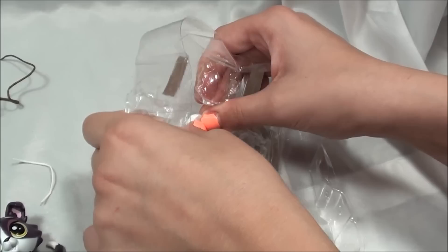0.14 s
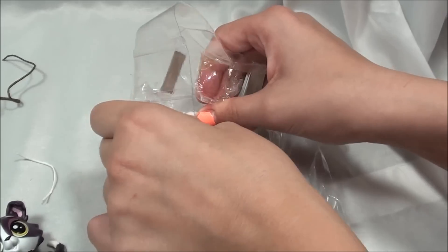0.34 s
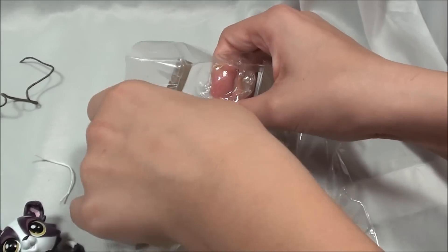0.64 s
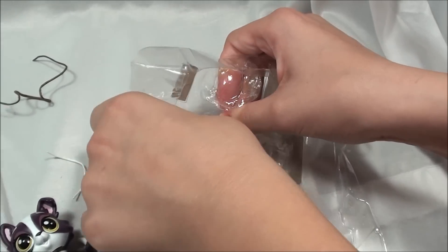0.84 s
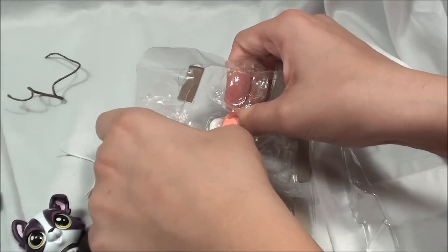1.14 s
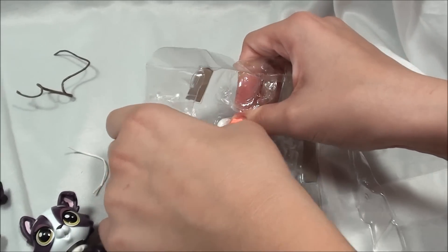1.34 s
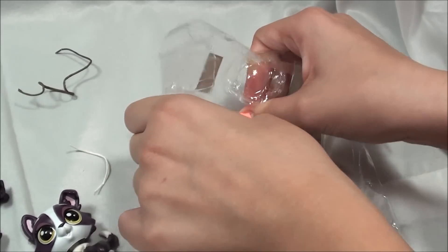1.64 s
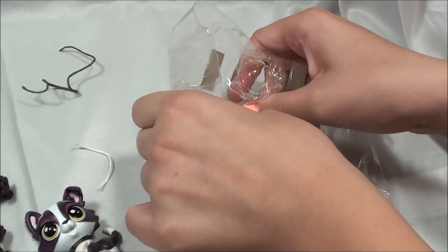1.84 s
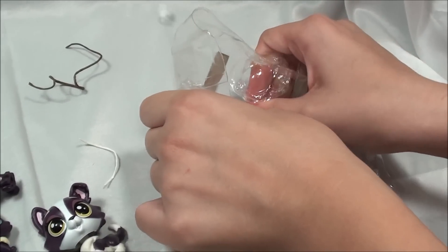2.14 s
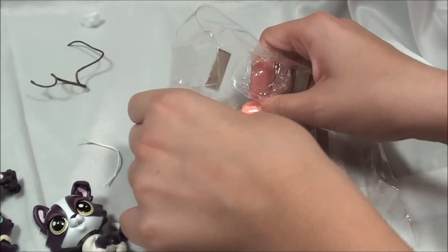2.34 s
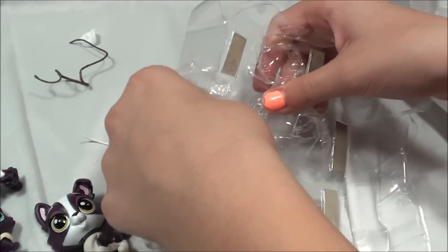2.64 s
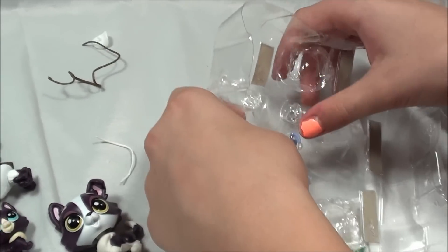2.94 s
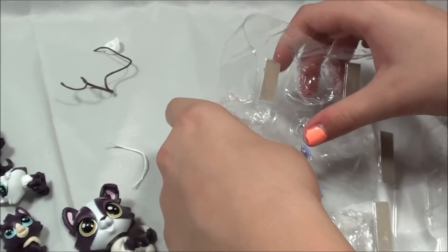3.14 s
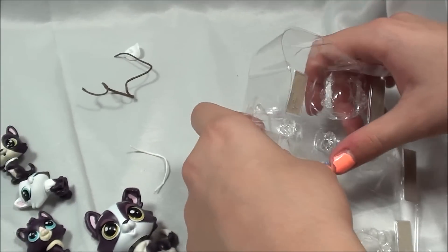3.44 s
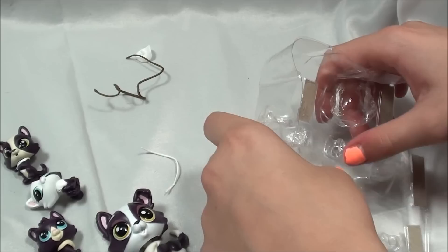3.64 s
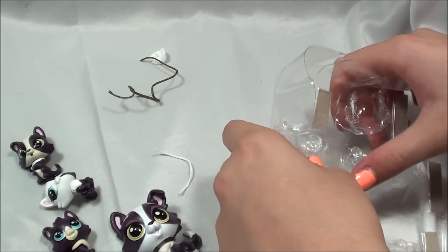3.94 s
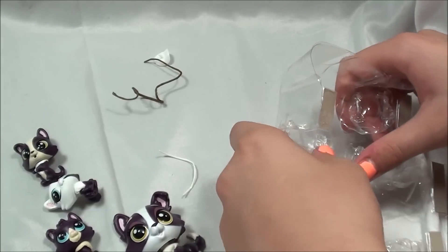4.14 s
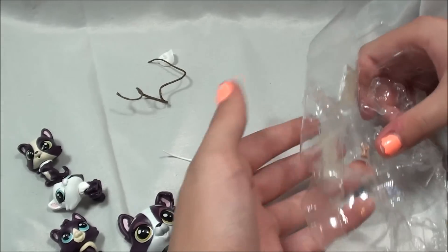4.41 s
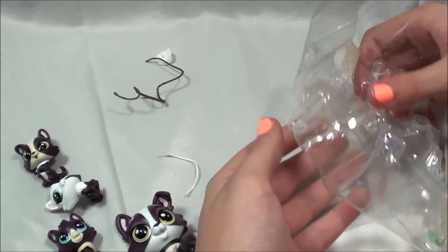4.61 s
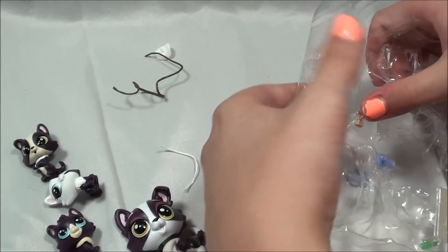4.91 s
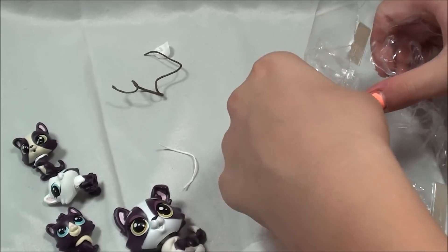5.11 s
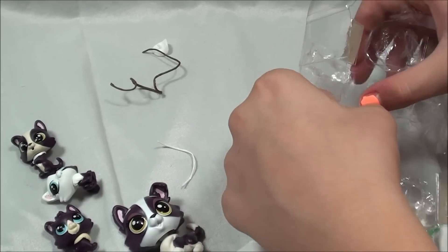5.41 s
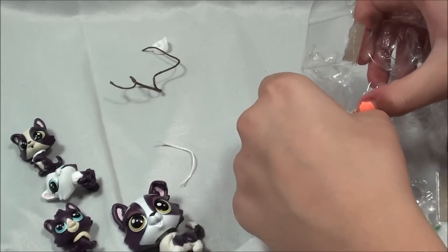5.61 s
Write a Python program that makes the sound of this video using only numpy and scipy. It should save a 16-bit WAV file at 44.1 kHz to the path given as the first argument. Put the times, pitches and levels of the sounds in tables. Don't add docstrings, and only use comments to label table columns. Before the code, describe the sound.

Close to the microphone, hands grip, twist and pry a stiff thin plastic tray. Sharp bright snaps and hollow pops come thickly for nearly three seconds, with short creaks and rustle. Then it calms to scattered small clicks, bursts into one strong crunch with a soft bump around four and a half seconds, and ends in light crackles. Small, fairly dry quiet room; faint hiss and low mains hum.

```python
import sys
import numpy as np
from scipy import signal
from scipy.fft import rfft, irfft, next_fast_len
from scipy.io import wavfile
from scipy.ndimage import map_coordinates

SR = 44100
rng = np.random.default_rng(int(sys.argv[2]) if len(sys.argv) > 2 else 0)


def voltage_ratio(level):
    return 10 ** (np.asarray(level, float) / 20)


def store_wav(level_fs):
    pcm = np.round(np.clip(np.atleast_2d(level_fs), -1, 1) * 32767)
    wavfile.write(sys.argv[1], SR, pcm.T.astype(np.int16))


N = 254456
SOFT_TOP_HZ = 15950

# (t/s, peak level/dB, ringing f/Hz)
CREASE_SNAPS = [(0.0094, -3, 6600), (0.0256, -9, 10400), (0.0299, -4.5, 5500), (0.047, -8.5, 5200),
                (0.066, -11, 7600), (0.1052, -12, 9500), (0.1498, -13, 3900), (0.1718, -4, 7580),
                (0.177, -0.5, 7800), (0.1987, -14, 5500), (0.2113, -10.5, 3670), (0.2455, -6, 8850),
                (0.2572, -4.5, 4080), (0.2844, -6, 9350), (0.294, -17, 8800), (0.3068, -1, 8300),
                (0.3189, -1, 5530), (0.3728, -8.5, 5600), (0.3949, -12, 4400), (0.4252, -15, 6000),
                (0.445, -4, 2770), (0.4796, -14, 6800), (0.502, -15.5, 3780), (0.5216, -6.5, 7560),
                (0.5697, -5.5, 9500), (0.5808, -14, 4500),
                (0.6494, -15, 6000), (0.672, 0.5, 6300), (0.691, -10, 8740), (0.696, -11, 4020),
                 (0.7004, -6, 10600), (0.706, -9, 8700), (0.7143, -1, 5300), (0.739, -12, 6400),
                 (0.845, -9.5, 6670), (0.872, 0, 7400), (0.91, -14, 3060), (0.9462, -12, 8200),
                 (0.953, -10.5, 7300), (1.0027, -17, 4100), (1.0228, -20, 4470), (1.0617, -8, 3230),
                 (1.0848, -4, 8060), (1.1714, -10, 7400), (1.211, -15.5, 3600), (1.2968, -17, 7100),
                 (1.2999, -6, 4900), (1.307, -7, 3720), (1.3431, -9.5, 5040), (1.3763, -12, 7960),
                 (1.399, -10, 4400), (1.422, -12, 2940), (1.457, -9, 6460), (1.489, -9, 3900),
                (1.519, 0.5, 3630), (1.5368, -1, 3600), (1.5639, 1.5, 3830), (1.616, -16, 9000),
               (1.6514, -3.5, 9000), (1.7184, -14.5, 6070), (1.7466, -7.5, 7960), (1.7685, -5.5, 3980),
               (1.7819, -8.5, 4160), (1.7908, -9.5, 3600), (1.81, -11.5, 4310), (1.8264, -8, 4010),
               (1.847, -7, 5670), (1.8865, -3.5, 4250), (1.899, -6, 3360), (1.91, -7.5, 8260),
               (1.9209, -5, 5430), (1.975, -8.5, 4900), (1.984, -11, 5290), (2.0077, -5, 6900),
               (2.019, -8.5, 7040), (2.0667, 0.5, 6400),
                (2.116, -5.5, 5700), (2.1304, 2, 8400), (2.1465, -2.5, 9600), (2.1733, -7.5, 6660),
                (2.195, -18, 9860), (2.4968, -6, 4030), (2.1835, -9.5, 6770), (2.2247, -1.5, 9600),
                (2.2724, -8, 3680), (2.378, -12.5, 6900), (2.384, -7, 2980), (2.394, -8, 9300),
                (2.446, -5.5, 7060), (2.4565, 0.5, 7040), (2.4777, -4, 7460), (2.482, -1, 10200),
                (2.506, -12.5, 7240), (2.5411, 1, 3820), (2.5757, -5, 7700), (2.6592, -0.5, 8000),
                (2.801, -11.5, 8160), (2.8317, -12, 6900), (2.837, -3, 7340), (2.9634, -14.5, 3600),
                (3.093, -17.5, 7200), (3.1412, -3, 6500), (3.207, -17, 3700), (3.3884, -17.5, 3480),
                (3.5932, -11, 3630), (3.853, -17.5, 2970), (3.96, -14, 5140), (4.006, -19, 7300),
                (4.0721, -22.5, 3480), (4.189, -18, 7000), (4.3262, -20.5, 6600), (4.3674, -6.5, 7900),
                (4.3742, -13, 3700), (4.387, -4.5, 7300), (4.43, -11, 6540), (4.4564, -3, 6300),
                (4.5282, -8, 6350), (4.701, -25.5, 3400), (4.8592, -33, 3850), (5.1193, -20.5, 9300),
                (5.1732, -23.5, 3630), (5.4994, -15.5, 9700), (5.5, -22, 13400), (5.53, -21, 10000),
                (5.561, -16, 9300), (5.568, -12, 9100), (5.6519, -19, 9700), (5.685, -19, 9300),
                (5.707, -11, 3270), (5.7098, -17, 7500), (5.718, -14.5, 6300),
                (1.3006, -15, 10000),
    (3.1412, -4, 10800),
    (3.1416, -5.5, 4100),
    (0.63, -4, 16000),
]
CREASES = CREASE_SNAPS

# (t/s, peak level/dB, ringing f/Hz)
DIMPLE_FLIPS = [(0.0096, -7, 1720), (0.101, -15.5, 1900), (0.148, -25, 1980), (0.2084, -6, 1540),
                (0.21, -8, 1006), (0.258, -17.5, 1430), (0.321, -12.5, 1680), (0.4452, -4, 840),
                (0.601, -12.5, 884), (0.6168, 0, 1303), (0.636, -10.5, 880), (0.671, -13.5, 1590),
                (0.839, -24, 2130), (0.874, -16, 1980), (1.004, -22, 1550), (1.085, -20, 1230),
                (1.1773, -6.5, 1580), (1.298, -6.5, 1540), (1.342, -16.5, 2550), (1.457, -18, 1780),
                (1.489, -18, 2000), (1.766, -20, 1500), (1.784, -14, 703), (1.828, -10, 1610),
                (1.831, -16.5, 696), (1.858, -25, 720), (1.887, -14.5, 1540), (1.895, -15.5, 695),
                (1.974, -20.5, 1600), (2.01, -16.5, 2620), (2.096, -24, 780), (2.1257, -10, 1470),
                (2.147, -11, 3510), (2.183, -19, 676), (2.223, -5.5, 1510), (2.373, -16.5, 1430),
                (2.39, -25, 2380), (2.482, -14, 1200), (2.497, -5.5, 727), (2.5411, -9.5, 1560),
                (2.5442, -6.5, 2830), (2.58, -8.5, 1500), (2.659, -3, 2580), (2.838, -9.5, 1330),
                (3.151, -11, 705), (3.389, -23.5, 1360), (3.961, -23.5, 2280), (4.071, -19, 910),
                (4.367, -7.5, 1970), (4.388, -5.5, 2520), (4.4126, -6, 2550), (4.4398, -3, 1870),
                (4.4422, -15, 990), (4.462, -3, 1350), (4.475, -7, 1500), (2.772, -42, 2000),
                (3.317, -35, 1520), (4.152, -35, 1070), (5.048, -42, 520), (5.71, -18.5, 2740)]
DIMPLES = DIMPLE_FLIPS

# (f/Hz, level per Hz/dB)
FINE_COLOUR = [(1470, -12), (2600, -8), (3600, -5), (5000, -8), (7300, -5.5), (9420, -14), (15100, -17),
               (16500, 1)]


def unit(x):
    return x / np.sqrt(np.mean(x ** 2) + 1e-20)


def along(points, hz):
    f, v = np.transpose(points)
    return np.interp(np.log(hz + 1), np.log(f + 1), v)


def curves(rows):
    s, *columns = np.transpose(rows)
    return [np.interp(np.arange(N) / SR, s, column) for column in columns]


def wobble(rate):
    knots = rng.standard_normal(int(N * rate / SR) + 4)
    return map_coordinates(knots, [np.arange(N) * rate / SR])


def decay(x, t60):
    return signal.lfilter([1], [1, -voltage_ratio(-60 / (t60 * SR))], x)


def filtered(x, response):
    m = next_fast_len(x.shape[-1] + 4096)
    return irfft(rfft(x, m) * response(np.fft.rfftfreq(m, 1 / SR)), m)[..., :x.shape[-1]]


def resonance(f, hz, width):
    return 1j * f * width / (hz * hz - f * f + 1j * f * width)


def high_pass(f, hz):
    return (1j * f / (hz + 1j * f)) ** 2


def place(s, db, rows):
    rows = rows / np.abs(rows).max(axis=1, keepdims=True) * voltage_ratio(db)[:, None]
    at = np.round(s * SR).astype(int)[:, None] + np.arange(rows.shape[1])
    return np.bincount(at.ravel(), rows.ravel(), N + SR)[:N]


def burst(count, t60, rise, tail_db, tail_t60, kick, spike_db=3, spike=0.37, size=4096):
    t = np.arange(size) / SR
    t60 = t60[:, None]
    rise = rise * voltage_ratio(3.5 * rng.standard_normal((count, 1)))
    first = voltage_ratio(spike_db - 60 * t / (spike * t60))
    tail = voltage_ratio(tail_db - 60 * t / tail_t60)
    shape = first + voltage_ratio(-60 * t / t60) + tail
    blow = kick * t / rise * np.exp(1 - t / rise)
    return blow + (1 - np.exp(-t / rise)) ** 2 * shape * rng.standard_normal((count, size))


def snaps():
    # (t/s, peak level/dB, ringing f/Hz)
    further_snaps = [(0.02, -11.5, 3170), (0.0402, -5, 11400), (0.0914, -25, 3620), (0.0948, -16, 6430),
                      (0.1317, -23, 3950), (0.1955, -16, 8040), (0.23, -16, 9570), (0.3927, -14, 6020),
                      (0.4035, -16, 4300), (0.4126, -19, 7210), (0.467, -18, 3120), (0.545, -28, 4120),
                      (0.5776, -16, 8090), (0.596, -16.5, 3840), (0.6, -21, 3750), (0.606, -25, 3730),
                      (0.609, -23, 4320), (0.6601, -11, 3090), (0.6671, -11, 4540), (0.794, -24, 7490),
                      (0.8011, -22, 12860), (0.8082, -25, 4740), (0.817, -26, 8290), (0.9275, -24, 6490),
                      (0.936, -22, 9500), (0.9426, -10, 3600), (0.966, -21.5, 7810), (1.011, -18, 8160),
                      (1.0496, -22, 8710), (1.1918, -17, 5210), (1.2291, -27, 13110), (1.2353, -23.5, 3050),
                      (1.289, -28, 5060), (1.3205, -25, 8000), (1.3953, -14, 3090), (1.412, -21, 4490),
                      (1.4152, -26, 6100), (1.4958, -15, 3090),
                      (1.5073, -18, 8600), (1.581, -17, 4630), (1.588, -17, 7600), (1.5936, -23, 11000),
                     (1.626, -26, 3090), (1.633, -14, 8410), (1.6367, -16, 7160), (1.76, -10, 8400),
                     (1.8008, -15, 3970), (1.8343, -18, 5600), (1.8755, -27, 6410), (1.9396, -20, 5160),
                     (1.9465, -22, 8060), (1.9542, -27, 5910), (2.0335, -19, 4180), (2.092, -15, 4290),
                     (2.099, -23, 4190), (2.108, -17, 4150), (2.2472, -19, 7100), (2.2933, -18, 4290),
                     (2.3077, -22, 3610), (2.3342, -18.5, 4520), (2.3609, -26, 6240), (2.365, -23, 7500),
                     (2.373, -20, 3730), (2.534, -19, 6380), (2.5583, -18, 12300), (2.6244, -22, 6740),
                     (2.636, -18, 3200), (2.65, -16, 14060), (2.666, -17, 6980), (2.6849, -25, 7780),
                     (2.691, -12.5, 6960), (2.7463, -31.5, 6650),
                      (2.922, -27, 9970), (3.4083, -34, 7190), (3.5809, -26, 9220), (3.7222, -28.5, 6900),
                     (3.8637, -29, 6150), (3.8846, -31, 6510), (3.9976, -22.5, 7360), (4.019, -28, 7700),
                     (4.3454, -24, 8420), (4.417, -12, 3600), (4.72, -28, 5070), (4.9879, -28, 8600),
                     (5.051, -23.5, 10300), (5.1655, -22, 2600), (5.2869, -30.5, 6050), (5.376, -29, 9690),
                     (5.388, -25, 9690), (5.4822, -31, 9700), (5.5195, -17.5, 9200), (5.5929, -31, 9560),
                     (5.6062, -32, 7800), (5.6147, -21, 8700), (5.631, -22, 8760), (5.6567, -25, 9410),
                     (5.6604, -25, 9680), (5.664, -24, 8210), (5.572, -15, 10500), (5.674, -19, 9400),
                     (5.6778, -25, 9170), (5.695, -23, 7080), (5.7413, -19, 3200), (5.759, -22, 11780)]

    s, db, hz = np.transpose(CREASES + further_snaps)
    t60 = 0.028 * (6000 / hz) ** 0.5
    hz = hz[:, None]
    push = burst(len(s), t60, 0.00006, tail_db=-24, tail_t60=0.06, kick=3.03, spike_db=13, spike=0.27, size=2048)
    ring = filtered(push, lambda f: resonance(f, hz, 0.23 * hz))
    tear = burst(len(s), 0.5 * t60, 0.00015, tail_db=-23, tail_t60=0.03, kick=0, spike_db=8, size=2048)
    crack = filtered(tear, lambda f: high_pass(f, 0.42 * hz))
    return place(s, db + 2.0, ring + 0.66 * crack)


def pops():
    # (t/s, peak level/dB, ringing f/Hz)
    further_dimples = [(0.2835, -23, 1710), (0.522, -25, 1670), (0.6957, -21.5, 1460), (0.8084, -26, 2210),
                       (0.9874, -26, 1650), (1.0491, -33, 2330), (1.0632, -21.5, 1460), (1.0767, -23, 1500),
                       (1.1679, -9, 1690), (1.3777, -22, 1490), (1.411, -19, 1170), (1.5208, -7.5, 2480),
                       (1.6528, -29, 1340), (1.7504, -19, 1560), (1.9458, -25, 1630), (2.333, -21, 2060),
                       (2.3927, -14, 2520), (2.6906, -17.5, 2190), (2.8175, -25, 2000), (2.8746, -30, 2250),
                       (2.9237, -29, 1540), (2.9636, -22, 2510), (3.1758, -22, 1070), (3.206, -18, 1680),
                       (3.3559, -29, 2030), (3.5936, -21.5, 2280), (3.689, -36, 870), (3.7063, -32.5, 1250),
                       (4.0147, -21, 1950), (4.1903, -22.5, 1980), (4.2372, -29, 2120), (4.3739, -9, 1960),
                       (4.5283, -19, 2560), (5.147, -34, 2340), (5.2212, -24.5, 2000), (5.569, -23, 1720),
                       (5.6638, -29.5, 1600), (5.742, -28, 1270)]

    s, db, hz = np.transpose(DIMPLES + further_dimples)
    t60 = np.clip(0.054 * (1500 / hz) ** 0.11, 0.01, 0.1)
    hz = hz[:, None]

    def panel(f):
        main = resonance(f, hz, 0.07 * hz + 25)
        overtone = resonance(f, 1.78 * hz, 0.5 * hz)
        whole_tray = resonance(f, 1030, 500)
        return (main - 0.18 * overtone + 0.18 * whole_tray) * high_pass(f, 0.4 * hz) ** 2

    push = burst(len(s), 0.4 * t60, 0.00013, tail_db=-20, tail_t60=130 / hz, kick=5)
    return place(s, db + 0.15, filtered(push, panel))


def rings():
    # (t/s, peak level/dB, f/Hz, t60/s)
    humming = [
        (0.449, -15.5, 895, 0.27),
        (1.18, -22, 1620, 0.08),
        (2.225, -9, 2010, 0.025),
        (2.498, -12.5, 680, 0.067),
        (4.479, -24, 854, 0.15),
        (4.492, -29.5, 1240, 0.32),
        (4.499, -30.5, 484, 0.3),
        (5.174, -23.5, 375, 0.1),
        (5.499, -34, 347, 0.057),
    ]

    s, db, hz, t60 = np.transpose(humming)
    hz = hz[:, None]
    push = burst(len(s), t60, 0.00068, tail_db=-40, tail_t60=t60[:, None], kick=4.8, size=8192)

    def pair(f):
        return resonance(f, hz, 0.13 * hz) ** 2 - 0.35 * resonance(f, 1.25 * hz, 0.2 * hz) ** 2

    return place(s, db, filtered(push, pair))


def creaks():
    # (t/s, level/dB, slips per s, scrape level/dB)
    folds = [
        [(.112, -30.5, 152, -17), (.165, -29, 146, -2), (.205, -38, 104, -14)],
        [(1.607, -33.5, 105, -4), (1.68, -41, 88, -16), (1.71, -33, 150, -12.5), (1.748, -36, 200, -10)],
        [(2.186, -31.5, 266, 3), (2.22, -28, 310, -13), (2.27, -33, 300, -4.5), (2.318, -24.5, 158, -12)],
        [(2.40, -33, 324, 2), (2.43, -35.5, 130, 3.5), (2.455, -38, 210, 3)],
    ]
    # (f/Hz, width/Hz, level/dB)
    fold_panels = [(1680, 250, -3), (3600, 1900, 4), (7240, 440, 4.5), (9600, 6400, -7.5)]

    slips, scrape = np.zeros((2, N))
    for rows in folds:
        db, rate, bright_db = curves(rows)
        on = slice(round(rows[0][0] * SR), round(rows[-1][0] * SR))
        turns = np.cumsum(rate[on]) / SR
        at = on.start + np.flatnonzero(np.diff(np.floor(turns)))
        scatter = rng.standard_normal((len(at), 2))
        late = np.round(0.08 * scatter[:, 0] * SR / rate[at]).astype(int)
        slips[at + late] = voltage_ratio(db[at] + 41.0 + 2.6 * scatter[:, 1]) * np.sqrt(200 / rate[at])
        scrape[at + late] = slips[at + late] * voltage_ratio(bright_db[at] - 27.5)
    scrape = decay(scrape, 0.02) * rng.standard_normal(N)

    def panel(f, row):
        hz, width, db = row
        return voltage_ratio(db) * resonance(f, hz, width)

    def small_panels(f):
        return sum((-1) ** k * panel(f, row) for k, row in enumerate(fold_panels[1:]))

    large = filtered(slips, lambda f: panel(f, fold_panels[0]) * resonance(f, 1680, 1300))
    return large + filtered(scrape, small_panels)


def crinkle(spectrum, rate, spread_db, t60):
    chance = rng.random((2, N))
    size_db = np.minimum(-abs(spread_db) * np.log(chance[1] + 1e-9), 11)
    sizes = (chance[0] < rate / SR) * voltage_ratio(size_db)
    puffs = decay(sizes, t60) * rng.standard_normal(N)
    return unit(filtered(puffs, lambda f: voltage_ratio(along(spectrum, f))))


def shaken(events, db):
    s, peak_db, _ = np.transpose(events)
    jolt = voltage_ratio(0.76 * peak_db + db)
    jolts = np.bincount(np.round(s * SR).astype(int), jolt, N)[:N]
    return decay(jolts, 0.085)


def rustle():
    # (t/s, effort level/dB, fine over body level/dB)
    handling = [(0, -31.5, 22), (.08, -39, -15), (.16, -34.5, 10), (.35, -27, 13), (.45, -37, -9),
                (.72, -42, 20), (1.13, -43.5, 3), (2.15, -37.5, -11), (2.62, -32, 12.5), (2.72, -43.5, 9.5),
                (3.3, -41.5, 10.5), (3.5, -46.5, 5.5), (4.0, -43.5, 5.5), (4.33, -41.5, 2),
                (4.58, -51, -19), (5.08, -56.5, 12), (5.33, -40, 6), (5.77, -53.5, 14)]
    # (f/Hz, level per Hz/dB)
    body_colour = [(88, -50), (150, 4.5), (489, -10), (871, 3), (1160, -2), (1490, 3.5), (4000, -12),
                   (5200, -15), (8800, -120)]

    effort_db, fine_db = curves(handling)
    body = crinkle(body_colour, rate=500, spread_db=4.0, t60=0.02)
    body = body + 0.096 * crinkle(body_colour, rate=3600, spread_db=21.0, t60=0.021)
    fine = crinkle(FINE_COLOUR, rate=450, spread_db=4.5, t60=0.008)
    fine = fine + 0.5 * crinkle(FINE_COLOUR, rate=5000, spread_db=1.5, t60=0.005)
    body_gain = voltage_ratio(effort_db - 6.0) + shaken(DIMPLES, -18.5)
    fine_gain = voltage_ratio(effort_db + fine_db - 9.5 + 2.2 * wobble(7.7)) + shaken(CREASES, -24.5)
    return filtered(body_gain * body + fine_gain * fine, lambda f: f < SOFT_TOP_HZ)


def slides():
    # (rise/s, t60/s, dull level/dB, bright level/dB)
    swells = [(0.015, 0.22, -25, -13.5), (0.0012, 0.017, -10, 2), (0.0047, 0.034, -12, 2.5),
              (0.00091, 0.16, -17.5, -12), (0.02, 0.087, -1.5, 3), (0.013, 0.14, -25, -24),
              (0.0034, 0.044, -18.5, -16), (0.053, 0.6, -56, -28), (0.028, 0.22, -42, -27),
              (0.12, 0.5, -31, -17.5)]
    starts = [.319, 2.539, 2.829, 4.386, 4.445, 5.157, 5.705, 3.03, 3.3, 4.27]

    rise, t60, dull_db, bright_db = np.transpose(swells)[:, :, None]
    t = np.maximum(np.arange(N) / SR - np.reshape(starts, (-1, 1)), 0)
    swell = (1 - np.exp(-t / rise)) * voltage_ratio(-60 * t / t60)
    dull_colour = [(300, -57.0), (700, -2.5), (1500, 7.5), (2500, 7.5), (5000, -21)]  # (f/Hz, level per Hz/dB)
    dull = crinkle(dull_colour, rate=2000, spread_db=14.5, t60=0.01)
    bright = crinkle(FINE_COLOUR, rate=2500, spread_db=3.5, t60=0.01)
    dull_gain = np.sum(voltage_ratio(dull_db) * swell, axis=0)
    bright_gain = np.sum(voltage_ratio(bright_db) * swell, axis=0)
    return dull_gain * dull + bright_gain * bright


def thumps():
    # (t/s, peak level/dB, f/Hz, t60/s)
    bumps = [
        (0.331, -37, 135, 0.18),
        (2.546, -36.5, 173, 0.019),
        (4.368, -36, 242, 0.24),
        (4.469, -30, 111, 0.074),
        (4.477, -26, 332, 0.21),
        (5.189, -35.5, 200, 0.063),
    ]

    s, db, hz, t60 = np.transpose(bumps)
    hz = hz[:, None]
    push = burst(len(s), np.clip(t60, 0.02, 0.2), 0.0016, tail_db=-29, tail_t60=0.17, kick=0, size=8192)
    return place(s, db + 4.5, filtered(push, lambda f: resonance(f, hz, 1.38 * hz) ** 2 * high_pass(f, 130)))


def room(x):
    # (f/Hz, t60/s)
    room_decay = [(300, 0.15), (2000, 0.0037), (5000, 0.058), (12000, 0.0052)]

    hz, t, z = signal.stft(rng.standard_normal((2, SR // 4)), SR, nperseg=128)
    dying = z * voltage_ratio(-60 * t / along(room_decay, hz)[:, None])
    tail = signal.istft(dying, SR, nperseg=128)[1]
    tail = tail / np.linalg.norm(tail[0])
    delayed = np.pad(x, (40, 0))[None]
    return signal.fftconvolve(delayed, tail, axes=1)[:, :N]


def hiss_and_hum():
    # (f/Hz, level per Hz/dB)
    hiss_colour = [(15, -35), (25, -18), (59, -8), (184, -0.5), (222, -2), (618, -2), (1350, -10),
                   (1920, -6.5), (3380, -13.5), (8220, -13), (12000, -16), (15700, -14)]
    # (f/Hz, likeness from 0 to 1)
    likeness = [(60, 0.94), (180, 0.55), (550, 0.19), (1650, 0.062), (4970, 0.7), (15000, 1)]
    # (f/Hz, rms level/dB)
    hum_tones = [(59.5, -69), (119, -69.5), (178.5, -70), (8500, -89)]

    def mid_side(f):
        angle = np.arccos(np.clip(along(likeness, f), -1, 1)) / 2
        return voltage_ratio(along(hiss_colour, f)) * (f < SOFT_TOP_HZ) * [np.cos(angle), np.sin(angle)]

    mid, side = filtered(rng.standard_normal((2, N)), mid_side)
    hiss = voltage_ratio(-50.0) * unit(np.array([mid + side, mid - side]))
    t = np.arange(N) / SR
    hum = sum(voltage_ratio(db + 7.5) * np.sin(2 * np.pi * hz * t) for hz, db in hum_tones)
    return (hiss + hum) * voltage_ratio([[-0.4], [0.4]])


def scene():
    # (t/s, left over right level/dB)
    position = [(0, -1), (3, -1.05), (4.2, -2), (5.77, -1)]
    # (f/Hz, level/dB)
    mic_treble = [(10000, -1), (13000, -6.5), (15500, -10), (16500, -39)]

    sheet = snaps() + pops() + rings() + creaks() + rustle() + slides()
    tray = filtered(sheet, lambda f: high_pass(f, 294)) + thumps()
    lean_db = (curves(position)[0] + 1.02 * wobble(49)) / 2
    direct = tray * voltage_ratio([lean_db, -lean_db])
    reflected = voltage_ratio(-14.0) * filtered(room(tray), lambda f: high_pass(f, 300))
    return filtered(direct + reflected, lambda f: voltage_ratio(along(mic_treble, f))) + hiss_and_hum()


def roll_off(x):
    return signal.sosfilt(signal.butter(12, 16820, fs=SR, output="sos"), x)


def record(dry):
    held = dry / (1 + np.abs(dry) ** 6) ** (1 / 6)
    mix = filtered(held, lambda f: (f < 16780) * high_pass(f, 11))
    return roll_off(mix)


dry = scene()
out = record(dry)
store_wav(out)
```